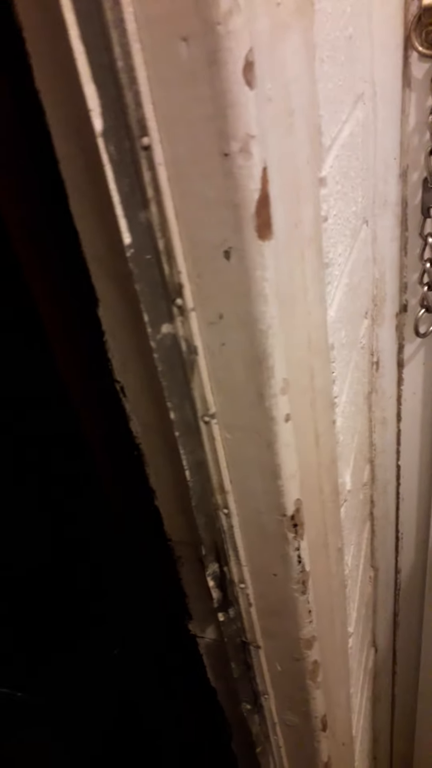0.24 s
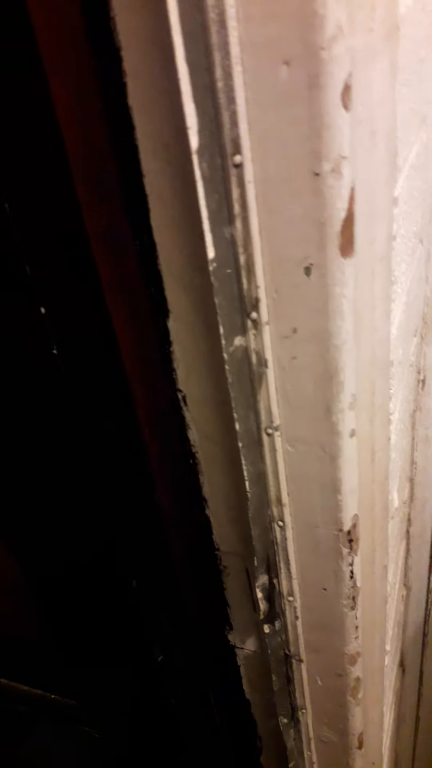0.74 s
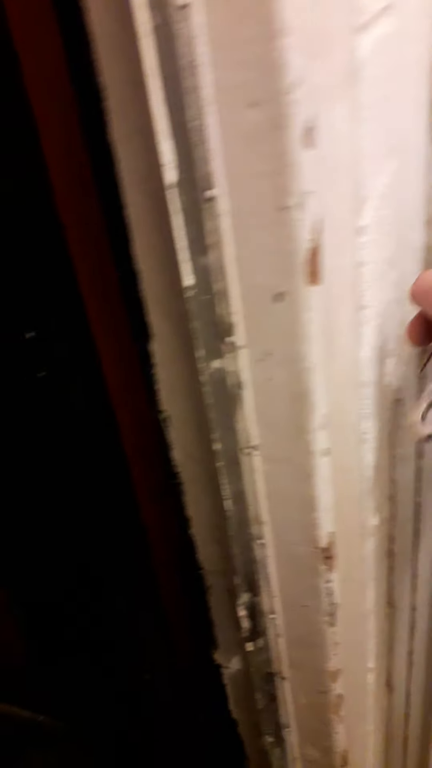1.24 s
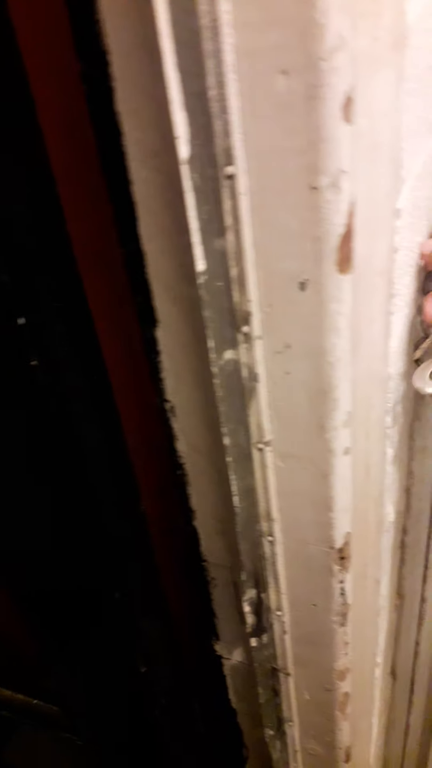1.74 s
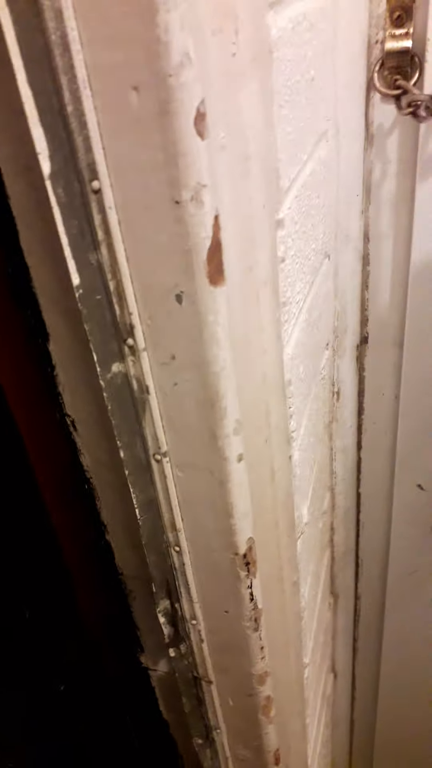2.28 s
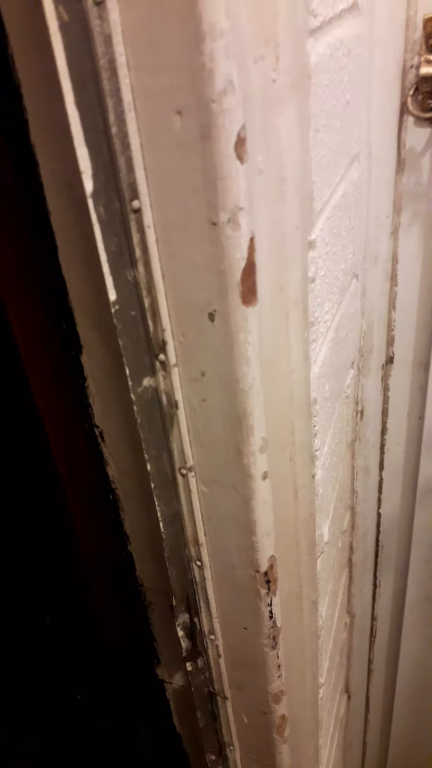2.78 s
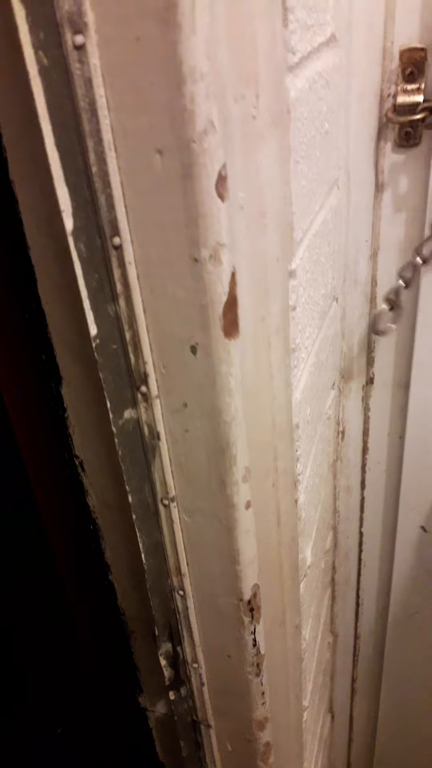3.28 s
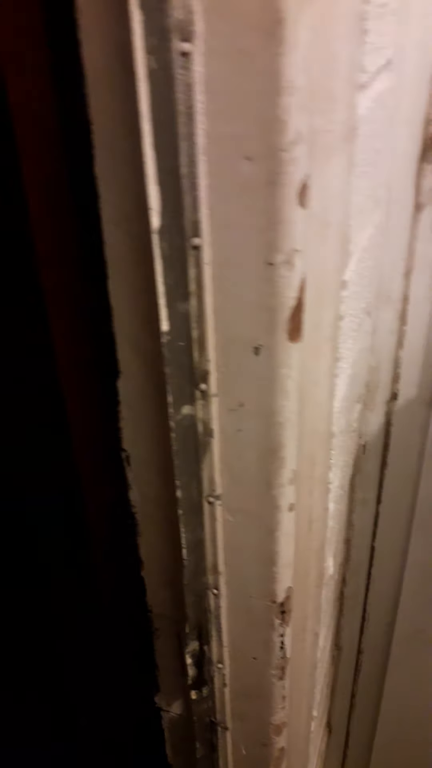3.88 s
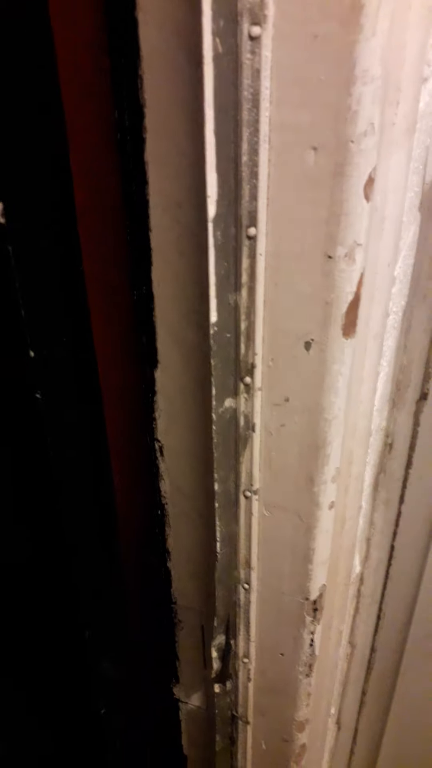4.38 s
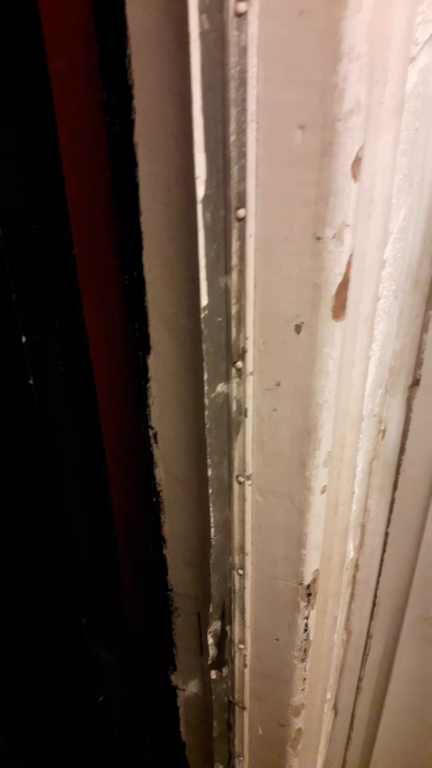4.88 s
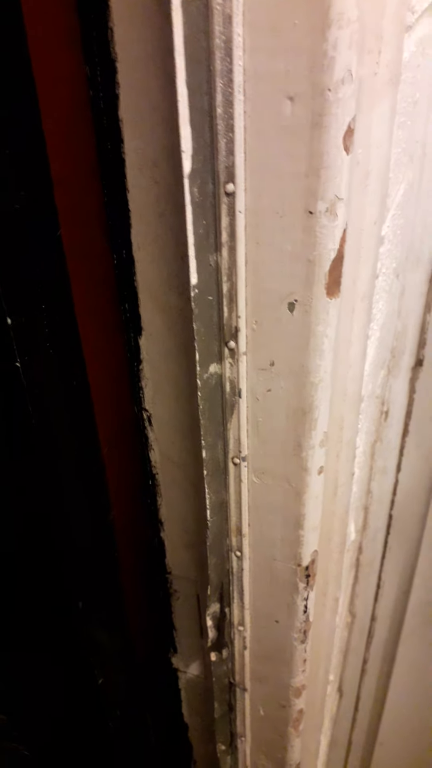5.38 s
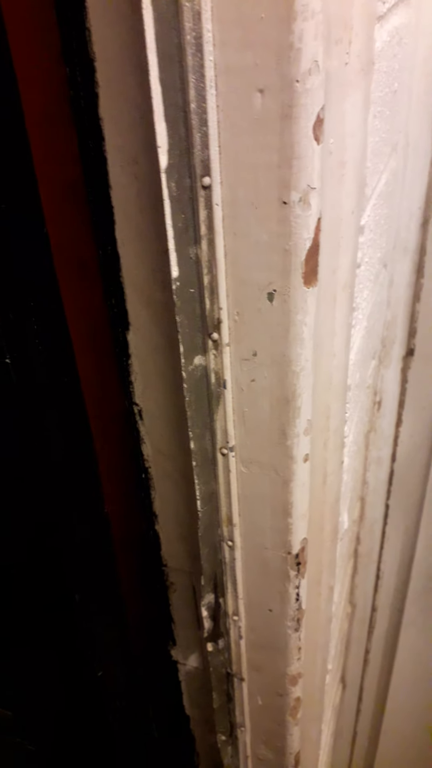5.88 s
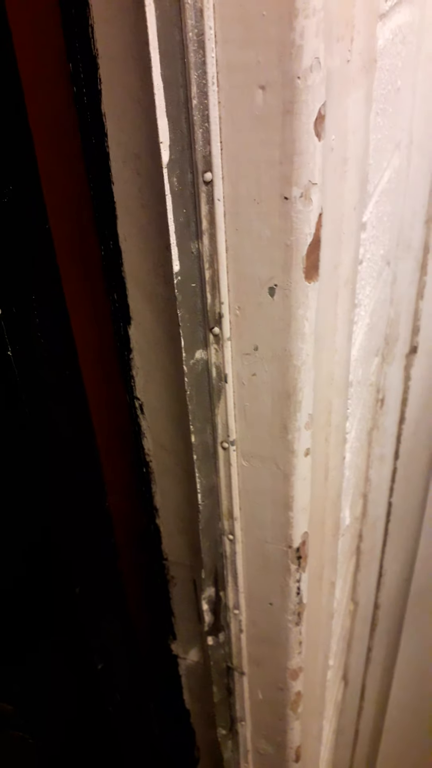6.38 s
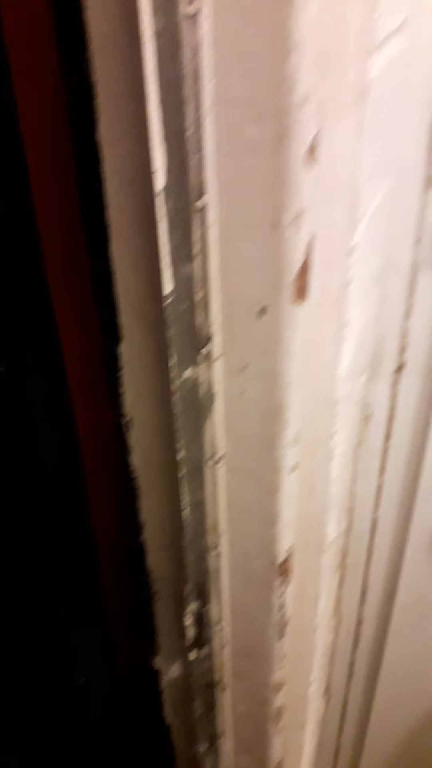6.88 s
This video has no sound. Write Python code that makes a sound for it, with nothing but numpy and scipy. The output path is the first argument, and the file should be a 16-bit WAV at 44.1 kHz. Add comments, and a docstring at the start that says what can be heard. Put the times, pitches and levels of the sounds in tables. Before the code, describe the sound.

Keys jingle and scrape in a front door lock, bolt snapping sharply, chain rattling on wood, two dull door thumps at the end.

```python
"""In a small hall, close to a hand-held phone, a front door is being locked.
The lock and the door chain clack against the wood: short chattering contacts that make the lock ring.
Metal scrapes and rattles as random tiny slips, and keys on the bunch ping and chime as fading tones.
A bolt snaps on its stop, the door panel booms softly and thumps twice near the end, and faint house air
lies below. Made-up echoes of the hall surround all but the air."""
import sys
import numpy as np
from scipy import signal
from scipy.fft import rfft, irfft
from scipy.io import wavfile
from scipy.ndimage import uniform_filter1d

SR = 44100
rng = np.random.default_rng(int(sys.argv[2]) if len(sys.argv) > 2 else 0)


def wav_record(signal):
    """Record a signal, one row per channel, as 16-bit PCM in the file named by sys.argv[1]."""
    frames = np.transpose(np.atleast_2d(signal))
    bounded = np.clip(frames, -1, 1)
    # unit amplitude maps onto the largest positive 16-bit level
    quanta = np.round(bounded * 32767).astype(np.int16)
    wavfile.write(sys.argv[1], SR, quanta)


N = 314874  # length in samples

# All event and mode levels are relative: each source scales them further.
# t60 is the time in which a sound fades by 60 dB.

# Still air of the house, its colour: f/Hz, level per Hz/dB
AIR_COLOUR = [(18, -39), (30, -16.5), (95, -9.5), (221, -10), (259, -23), (461, -14.5), (569, -10),
              (666, -24), (721, -1.5), (780, -20.5), (1190, -18.5), (5900, -30), (7270, -17), (8300, -37),
              (16000, -25)]
AIR_DB = -67.5  # average (RMS) level of the air
# How long the hall rings on: f/Hz, t60/s
HALL_DECAY = [(100, 0.38), (500, 0.3), (2000, 0.21), (5000, 0.31), (8000, 0.092), (15000, 0.21)]

# The door moves in its frame: t/s, push time/ms, level/dB
DOOR_BUMPS = [(0.137, 18, -53), (0.682, 27, -45.5), (2.86, 20, -42), (3.197, 39, -40.5), (3.735, 12, -45),
              (4.496, 12, -37), (4.524, 12, -60), (6.692, 7.6, -28), (6.836, 9.8, -40)]
# Resonances of the wooden door panel: f/Hz, level/dB, t60/s
PANEL_MODES = [(58, -1.5, 0.06), (84, 0.5, 0.085), (129, 1, 0.055), (155.3, 5.5, 0.15), (195, -2.5, 0.081),
               (227, 4, 0.048), (332, -6, 0.044), (373, 3.5, 0.052), (450, 2.5, 0.16), (612, -7.5, 0.011)]
# A bolt snaps against its stop: t/s, f/Hz, level/dB
BOLT_SNAPS = [(1.515, 1700, -29.5), (1.568, 1900, -30), (1.6188, 1800, -12.5), (2.626, 2064, -7.5),
              (3.7263, 2070, -7.5), (3.7323, 2450, -10.5), (3.741, 1990, -16.5)]

# Strokes of metal sliding on metal: t of hardest push/s, rise/s, fall/s, rub level/dB, grit level/dB
SLIDING_STROKES = [(0.062, 0.095, 0.6, -51.5, -48), (0.499, 0.061, 0.53, -48.5, -38.5),
                   (0.718, 0.14, 0.042, -35, -39.5), (.9, 0.25, 0.25, -76, -41.5),
                   (1.8, 0.33, 0.53, -55.5, -57), (2.12, 0.13, 0.067, -51.5, -71),
                   (3.961, 0.31, 0.24, -62.5, -78), (4.432, 0.098, 0.096, -39, -51.5),
                   (4.6, 0.17, 1, -54.5, -58.5), (5.17, 0.059, 0.44, -43.5, -47.5),
                   (5.829, 0.23, .17, -51, -62)]
STROKE_RANGE_DB = 20  # a stroke climbs this much over its rise and sinks as much over its fall

# Thin pings of the small keys: t/s, f/Hz, level/dB
KEY_PINGS = [(.999, 2355, -43), (1.868, 13603, -42), (1.984, 14300, -51), (2.642, 13640, -29),
             (2.642, 14500, -28.5), (2.986, 13671, -56), (3.644, 13570, -44), (3.727, 13300, -40.5),
             (4.043, 13700, -44), (4.505, 13520, -33), (5.1805, 13600, -29), (5.194, 13643, -10.5),
             (5.206, 15400, -43.5), (5.326, 14180, -29), (5.327, 13600, -28)]
# A large key swings free and chimes: t/s, level/dB
KEY_CHIMES = [(4.5034, -28.5), (4.528, -31), (5.0785, -37.5)]
# Resonances of that large key: f/Hz, level/dB, t60/s
KEY_MODES = [(5663, -8, .18), (6505, -8, .16), (6630, -5, .21), (7208, -12, .18), (7381, -8, .14),
             (8074, -2, .13), (8161, -3, .15), (10540, -11, .16), (11700, -7, .15), (13570, -7, .1)]

# Lock and chain clack on the door: t/s, contact time/ms, clack level/dB,
# then relative to the clack: wooden thud level/dB, metal edge level/dB, fizz level/dB
DOOR_CLACKS = [(0.1346, 6.7, -21, -10, -2.5, -8.5), (1.318, 6.2, -49, -9.5, -7.5, -37),
               (1.515, 1.4, -30.5, -27, -24.5, -46), (1.567, 1, -32.5, -26, -22.5, -42),
               (1.585, 3.8, -22.5, -21, -14, -43.5), (1.6179, 2, -18.5, -40, -9.5, -37.5),
               (1.668, 1.8, -31, -20, -2.5, -45), (1.692, 4, -33.5, -17, -21, -42),
               (1.769, 18.4, -35.5, -22, -3, -36), (1.839, 1.06, -30, -16, -10.5, -51),
               (2.3322, 2, -40, -22.5, -11, -54), (2.456, 12, -31.5, -26.5, -3, -12.5),
               (2.5016, 6.5, -28.5, -22, -19, -16), (2.547, 6.6, -36, -16, -20.5, -37),
               (2.626, 2.03, -16, -21.5, -5, -22.5), (2.7536, 2.7, -22, -19, -0.5, -12.5),
               (2.787, 2.6, -22.5, -27.5, -18.5, -15.5), (2.819, 6.3, -20, -15.5, -2, -18),
               (2.847, 11.2, -12.5, -29, -14.5, -18), (2.858, 6.4, -22.5, -6, -5, -30),
               (2.9961, 1.3, -36, -17.5, -8.5, -23), (3.1669, 35, -36, -18, -8, -35),
               (3.1961, 6, -20, -12, -8.5, -10), (3.329, 5.7, -43.5, -6.5, -29, -18),
               (3.703, 5.5, -53, -2.5, -5, -24), (3.7268, 1.3, -24.5, -23.5, 2, -17.5),
               (3.741, 1.2, -34.5, -14, 7.5, -13), (4.2044, 5, -55, -10, -23, -22),
               (4.489, 5.7, -40, -6.5, -6, -19), (4.6124, 1, -47.5, -13, -3.5, -23),
               (4.695, 6.4, -42, -16, -15, -21), (4.753, 5, -39.5, -13.5, -9, -21),
               (4.7689, 3.8, -26, -18.5, -3.5, -19), (4.825, 14.7, -28.5, -12, -5.5, -14),
               (4.9898, 4.1, -44, -18.5, -6, -24.5), (5.102, 4.6, -42, -31, -6, -25),
               (5.1897, 14.2, -20, -13.5, -0.5, -4.5), (5.228, 1.2, -27, -19, -4, -11.5),
               (5.274, 3.3, -31.5, -3, -23.5, -30.5), (5.3252, 0.54, -26, -17.5, 2.5, -5.5),
               (5.431, 3.5, -32.5, -19.5, -5.5, -5), (5.6319, 6, -44, -26, -7, -13),
               (5.6584, 9.6, -28.5, -20.5, 1.5, -9.5), (5.694, 2.8, -32, -13, -27, -19),
               (5.85, 2, -40, -16, -1.5, -22), (6.0388, 3.9, -35, -12.5, -18.5, -42),
               (6.0849, 7, -37.5, -10.5, -6, -28), (6.1147, 4.9, -27.5, -17.5, -3.5, -8.5),
               (6.665, 28.5, -33, 2, -6, -24), (6.6912, 4.6, -24, 1.5, 0, -9),
               (6.824, 10.8, -31, 0, -5.5, -8), (6.839, 2.8, -23.5, -13.5, -6, -26)]
# Light ticks of metal on metal: t/s, contact time/ms, metal edge level/dB, fizz level/dB
METAL_TICKS = [(0.0622, 1.1, -54, -29.5), (0.16, 0.94, -47, -27.5), (0.252, 3, -48.5, -47),
               (.488, 2.5, -59, -30), (0.5192, 4.7, -56, -32.5), (.5558, 5.3, -57, -35),
               (0.622, 4.1, -49, -37), (0.6637, 4, -43, -38.5), (.681, 6.7, -46, -34), (0.742, 2, -62, -40),
               (.815, .6, -37, -38), (0.883, 3, -37, -46), (.901, 1.2, -39.5, -40), (.976, 5, -51.5, -57),
               (0.9993, 3.3, -40.5, -52), (1.274, 2.5, -47, -62), (1.899, 3.7, -46.5, -60),
               (4.0428, 1.3, -55, -78.5), (4.5059, 0.49, -49, -34), (5.0804, 3, -40.5, -65),
               (5.482, 0.97, -45, -68), (5.5093, 2.4, -37.5, -48), (6.366, 3, -63, -70)]
# Resonances of lock case and door panel: f/Hz, level/dB, t60/s
LOCK_MODES = [(440, -12, .04), (590, -13, .04), (1016, -9, .04), (1270, -8, .03), (1375, -8, .03),
              (1735, -3, .04), (1885, -2, .04), (2120, -3, .03), (2420, -5, .04), (2610, -5, .04),
              (3800, -5, .02), (4480, -4, .02), (5750, -3, .02), (7050, -2, .02), (7370, -1, .06),
              (7520, -2, .05), (7760, 0, .02), (10400, -4, .02), (11750, -4, .03)]
LOCK_RING_DB = -9  # ring compared with the bare contact
# Colour of the contacts and slips as heard; the sound dips deeply near 8.8 kHz: f/Hz, level per Hz/dB
CONTACT_COLOUR = [(40, -39.5), (130, -15.5), (400, -5), (1000, -4.5), (1900, -1.5), (3200, -8.5),
                  (5000, -1.5), (7600, 2), (8800, -16.5), (12000, -8.5), (15500, -15)]
# Edges of the four registers thud, clack, edge and fizz: f/Hz
REGISTER_EDGES = [60, 700, 3000, 8500, 16500]
# A loose part falls back once after each clack: typical delay, spread of its logarithm, level change
REBOUND_S, REBOUND_SPREAD, REBOUND_DB = .022, .3, -16.5
# Loose keys jostle at random while metal slides: average rate, level over the grit, scatter
JOSTLES_PER_S, JOSTLE_DB, JOSTLE_SCATTER_DB = 34, -6.5, -0.5
JOSTLE_MS = 3.5  # contact time of a jostling key
# A tick has little body: its clack and thud lie this far below its edge
TICK_CLACK_DB, TICK_THUD_DB = -17, -34

TOP_HZ = 16100  # the phone passes nothing much above this
RING_S = np.arange(SR // 4) / SR  # time axis of one ring, in seconds


def undb(db):
    """Turn decibels into a gain."""
    return 10 ** (np.asarray(db) / 20)


def unit(x):
    """Scale a sound to an energy of one."""
    return x / np.sqrt(np.sum(x ** 2) + 1e-20)


def noise(count):
    """Draw white noise."""
    return rng.standard_normal(count)


def lookup(hz, points):
    """Read a value between (f/Hz, value) points, on a log-frequency axis."""
    f, value = np.transpose(points)
    return np.interp(np.log(hz + 1), np.log(f), value)


def colour(x, points, size=2048):
    """Filter to the given (f/Hz, level/dB) outline without sounding ahead of time."""
    outline = undb(lookup(np.arange(size // 2 + 1) * SR / size, points))
    # folding the cepstrum (spectrum of the log outline) gives a filter that starts at once
    cepstrum = irfft(np.log(outline))
    cepstrum[1:size // 2] *= 2
    cepstrum[size // 2 + 1:] = 0
    response = irfft(np.exp(rfft(cepstrum)))
    return signal.fftconvolve(x, response)[:len(x)]


def band(lo_hz, hi_hz, order=3):
    """Design a filter that passes one band of pitches."""
    return signal.butter(order, [lo_hz, min(hi_hz, SR / 2 - 1)], "band", fs=SR, output="sos")


def add(track, s, sound):
    """Mix a sound into a track at a time in seconds."""
    start = max(int(s * SR), 0)
    track[start:start + len(sound)] += sound[:len(track) - start]


def air():
    """Faint steady rumble and hiss of the house: coloured noise."""
    return undb(AIR_DB) * np.sqrt(N) * unit(colour(noise(N), AIR_COLOUR))


def hall(x, wet_db=1, gap_s=.0028, early_db=-5, early_t60=0.091, treble_db=-2):
    """Door, frame and near walls answer within milliseconds; a short tail follows, longest in the bass."""
    t = np.arange(SR // 2) / SR
    edges = np.geomspace(45, 18000, 10)
    tail = 0
    for lo, hi in zip(edges, edges[1:]):
        decay = np.exp(-np.log(1000) * t / lookup(np.sqrt(lo * hi), HALL_DECAY))
        # wider bands hold more energy; treble_db applies to bands starting above 4 kHz
        share = np.sqrt(2 * (hi - lo) / SR) * undb(treble_db * (lo > 4000))
        tail = tail + share * unit(signal.sosfilt(band(lo, hi), noise(len(t))) * decay)
    # sparse early echoes, about 600 a second
    echoes = (rng.random(len(t)) < 600 / SR) * noise(len(t))
    early = unit(echoes * np.exp(-np.log(1000) * t / early_t60))
    response = np.zeros(len(t))
    response[0] = 1  # the direct sound
    add(response, gap_s, undb(wet_db) * tail + undb(early_db) * early)
    return signal.fftconvolve(x, unit(response))


def roaming(x, count=8):
    """The phone is hand-held: as it moves, one pattern of reflections fades into the next."""
    place, out = np.linspace(0, count - 1, N), np.zeros(N)
    for k in range(count):
        near = np.flatnonzero(np.abs(place - k) < 1)
        fade = (1 - np.abs(place[near] - k)) ** .7
        add(out, (near[0] + .5) / SR, hall(x[near] * fade))
    return out


def ring(modes, scatter_db, detune):
    """A struck body rings as fading sines; each strike shifts their pitch, weight and sign a little."""
    hz, db, t60 = np.transpose(modes)[:, :, None]
    t = RING_S[:int(t60.max() * SR)]
    size, pitch, side = rng.standard_normal((3, len(hz), 1))
    wave = np.sin(2 * np.pi * hz * (1 + detune * pitch) * t) * np.sign(side)
    decay = np.exp(-np.log(1000) * t / t60)
    return np.sum(undb(db + scatter_db * size) * wave * decay, axis=0)


def contact(ms, grain_db, size=4096):
    """A first touch and a dying chatter of tiny ones, which together favour no pitch."""
    t = RING_S[:size]
    grains = np.repeat(np.clip(noise(size // 32), -1.5, 1.5), 32)  # uneven loudness in short steps
    age = t * 1000 / max(ms, .5)
    envelope = undb(grain_db * grains) * np.exp(-age) * np.tanh(4 * age)
    chatter = noise(size) * envelope
    limit = 2 * unit(envelope)
    # flatten the spectrum and confine it in time, in turns
    for _ in range(5):
        spectrum = rfft(chatter)
        chatter = irfft(spectrum / (np.abs(spectrum) + 1e-12))
        chatter = np.clip(chatter, -limit, limit)
    return np.pad(unit(chatter), (0, size // 2))


def strike(modes, ms, grain_db):
    """A chattering contact, and the ring that it draws from a body."""
    push = contact(ms, grain_db)
    modal = ring(modes, scatter_db=2.5, detune=.008)
    return push, unit(signal.fftconvolve(push, modal)[:len(push)])


def door(bump_db=24):
    """Soft pushes make the wooden panel boom on its low resonances."""
    out = np.zeros(N)
    for s, ms, db in DOOR_BUMPS:
        _, boom = strike(PANEL_MODES, ms, grain_db=2)
        add(out, s, undb(db + bump_db) * boom)
    return signal.sosfilt(band(62, 1500, order=2), out)


def bolt(upper=1.5, upper_db=-5, snap_db=6):
    """The bolt's stop rings for a few cycles on two damped modes; it sounds only between about 620 Hz and 3.5
    kHz."""
    out = np.zeros(N)
    for s, hz, db in BOLT_SNAPS:
        modes = [(hz, 0, .009), (hz * upper, upper_db, .005)]
        snap = ring(modes, scatter_db=1, detune=.01)
        add(out, s, undb(db + snap_db) * snap)
    return signal.sosfilt(band(620, 3500, order=2), out)


def slips(per_s, spread_db):
    """Metal sticks and slips: clicks of very uneven size at random moments."""
    count = int(per_s * N / SR)
    sizes = undb(spread_db * np.minimum(rng.exponential(size=count), 3))
    signs = np.sign(noise(count))
    return np.bincount(rng.integers(0, N, count), signs * sizes, N)


def effort(t):
    """Gains of rub and grit over time: each stroke swells to its hardest push and lets go."""
    rub = grit = 0
    for s, rise_s, fall_s, rub_db, grit_db in SLIDING_STROKES:
        swell = undb(-STROKE_RANGE_DB * np.maximum((s - t) / rise_s, (t - s) / fall_s))
        rub = np.maximum(rub, undb(rub_db) * swell)
        grit = np.maximum(grit, undb(grit_db) * swell)
    return rub, grit


def sliding():
    """Slips come in little fits; each stirs one region of the metal or the door panel for a moment."""
    rub, grit = effort(np.arange(N) / SR)
    # random loudness in 500-sample steps, slightly smoothed
    steps = np.repeat(np.clip(noise(N // 500 + 1), -1.5, 1.5), 500)
    fits = undb(3 * uniform_filter1d(steps, 150)[:N])
    low_edges, high_edges = np.geomspace(270, 1950, 5), np.linspace(3000, 16000, 10)  # rub, grit
    layers = []
    for edges in (low_edges, high_edges):
        grains = np.zeros(N)
        for lo, hi in zip(edges, edges[1:]):
            grains += signal.sosfilt(band(lo, hi, order=2), slips(per_s=500, spread_db=5.5))
        layers.append(np.sqrt(N) * unit(fits * colour(grains, CONTACT_COLOUR)))
    return rub * layers[0], grit * layers[1]


def keys(ping_t60=.07, ping_db=3, chime_db=-2):
    """Small keys ping on a close pair of modes; the large one chimes on many."""
    out = np.zeros(N)
    for s, hz, db in KEY_PINGS:
        pair = [(hz, 0, ping_t60), (hz - 130, -11, ping_t60)]
        ping = ring(pair, scatter_db=.5, detune=.0003)
        add(out, s, undb(db + ping_db) * ping)
    for s, db in KEY_CHIMES:
        chime = ring(KEY_MODES, scatter_db=2, detune=.001)
        add(out, s, undb(db + chime_db) * chime)
    return out


def tick(s, ms, edge_db, fizz_db):
    """Describe a tick as a very light clack, with the same columns."""
    clack_db = edge_db + TICK_CLACK_DB
    return s, ms, clack_db, TICK_THUD_DB - TICK_CLACK_DB, -TICK_CLACK_DB, fizz_db - clack_db


def rebounds():
    """A loose part falls back: a weaker touch with the same balance follows each clack."""
    delays = REBOUND_S * np.exp(REBOUND_SPREAD * noise(len(DOOR_CLACKS)))
    return [(s + delay, ms, db + REBOUND_DB, *shares)
            for (s, ms, db, *shares), delay in zip(DOOR_CLACKS, delays)]


def jostles():
    """Random ticks, as strong as the sliding that shakes the keys; they rest when it is gentle."""
    wait, edge, fizz = rng.random((400, 3)).T
    times = np.cumsum(-np.log(1 - wait)) / JOSTLES_PER_S
    _, grit = effort(times)
    levels = 20 * np.log10(grit + 1e-12) + JOSTLE_DB
    edge_db = levels + JOSTLE_SCATTER_DB * (2 * edge - 1)
    fizz_db = levels + JOSTLE_SCATTER_DB * (2 * fizz - 1)
    shaken = (levels > -66) & (times < N / SR)
    rows = zip(times[shaken], edge_db[shaken], fizz_db[shaken])
    return [tick(s, JOSTLE_MS, e, f) for s, e, f in rows]


def touches():
    """Gather the contacts that ring the lock: clacks, ticks, rebounds and jostling keys."""
    ticks = [tick(*row) for row in METAL_TICKS]
    return list(DOOR_CLACKS) + ticks + rebounds() + jostles()


def touch_colour(thud_db):
    """Broad resonances of other small parts vary the treble; light touches are also lean below."""
    hz = np.geomspace(40, 16000, 60)
    dents = 3.5 * np.clip(hz / 4000, 0, 1) * noise(len(hz))
    # a strong thud fills out the lows instead
    lean = np.clip((thud_db + 16) / 2, -8, 3) * np.clip(np.log2(1700 / hz), 0, 1)
    return np.column_stack([hz, lookup(hz, CONTACT_COLOUR) + dents + lean])


def blows(grain_db=4, blow_db=26, tick_db=22):
    """Each contact cracks and rings the lock; returns what fills the hall and what arrives direct."""
    out, direct = np.zeros((2, N))
    registers = [band(lo, hi, order=4) for lo, hi in zip(REGISTER_EDGES, REGISTER_EDGES[1:])]
    for s, ms, db, thud_db, edge_db, fizz_db in touches():
        push, body = strike(LOCK_MODES, ms, grain_db)
        raw = colour(push + undb(LOCK_RING_DB) * body, touch_colour(thud_db))
        # how hard and where it lands sets thud, edge and fizz
        shares = undb([thud_db, 0, edge_db, fizz_db])
        mix = sum(g * unit(signal.sosfilt(sos, raw)) for g, sos in zip(shares, registers))
        hit = undb(db + blow_db) * mix
        # light bright ticks beam at the phone and hardly stir door or hall
        beamed = np.clip(edge_db / tick_db, 0, .7)
        add(out, s, (1 - beamed) * hit)
        add(direct, s, beamed * hit)
    return out, direct


def scene(grit_direct=0.29, keys_direct=0.44):
    """All the metalwork is heard in the hall; the keys and the grit are nearest the phone."""
    clacks, ticks = blows()
    rub, grit = sliding()
    bunch = keys()
    reverberant = roaming(clacks + bolt() + door() + rub + (bunch + grit) / 2)
    near_phone = ticks + grit_direct * grit + keys_direct * bunch
    return (reverberant + near_phone + air())[None]


def record(dry):
    """The phone rounds the highest peaks and cuts the top."""
    rounded = np.tanh(dry)
    low_pass = signal.ellip(10, .2, 70, TOP_HZ, fs=SR, output="sos")
    return signal.sosfilt(low_pass, rounded)


dry = scene()
out = record(dry)
wav_record(out)
```